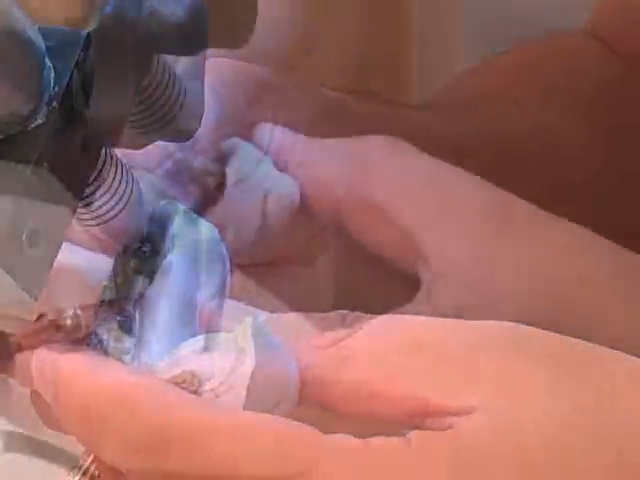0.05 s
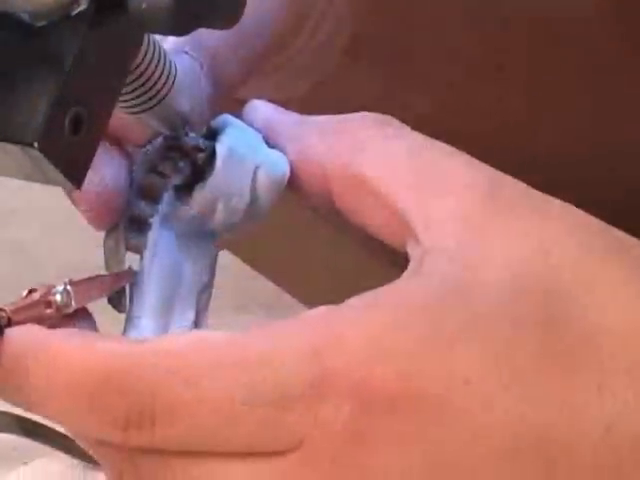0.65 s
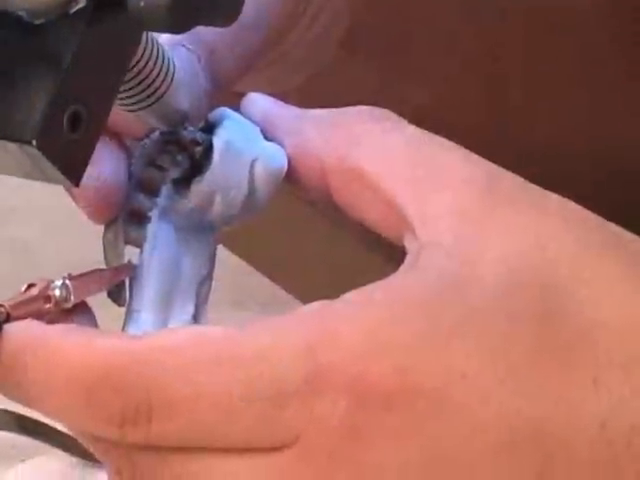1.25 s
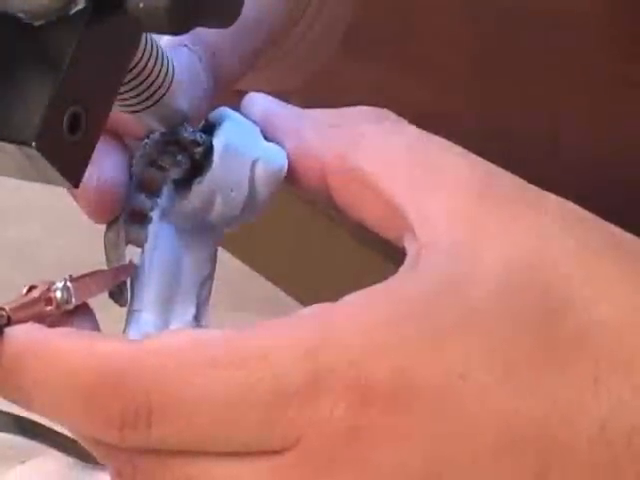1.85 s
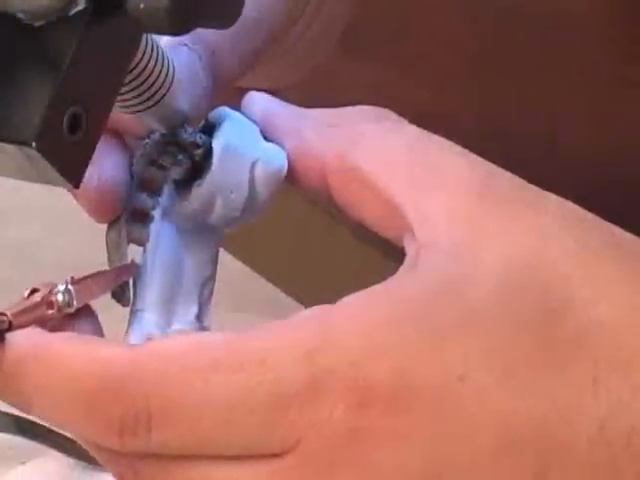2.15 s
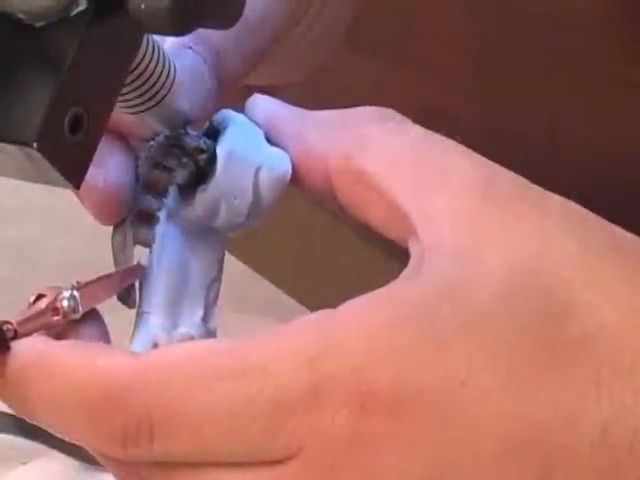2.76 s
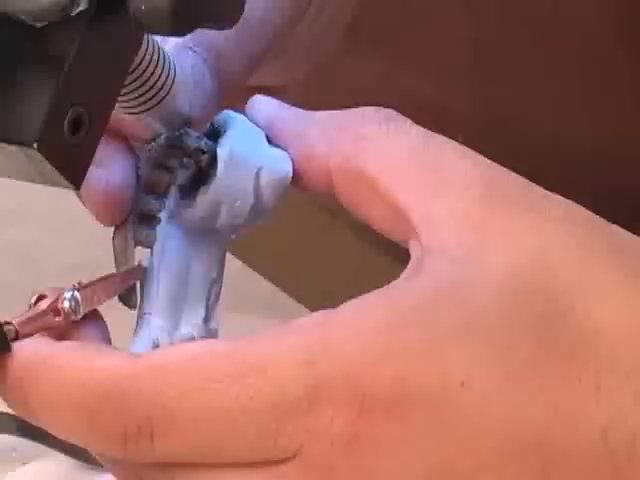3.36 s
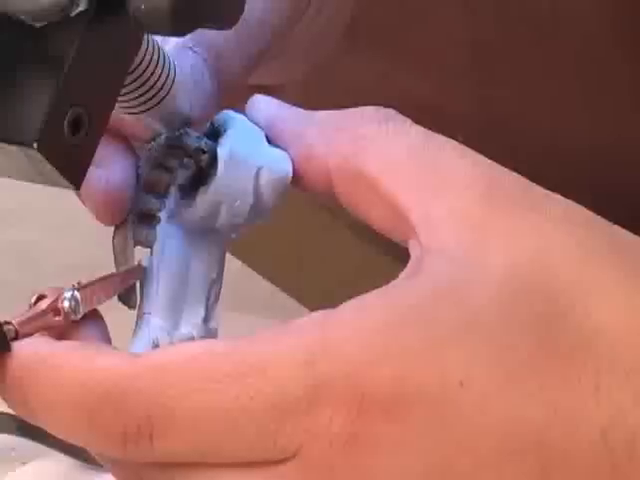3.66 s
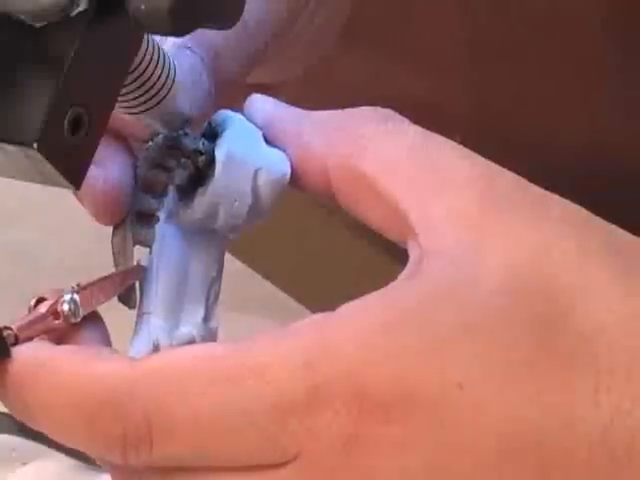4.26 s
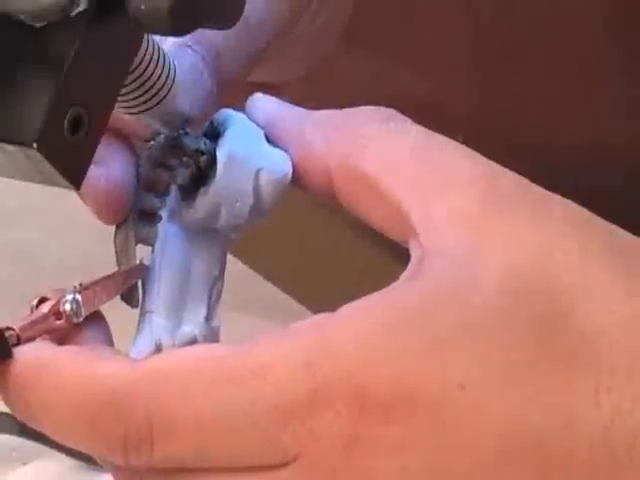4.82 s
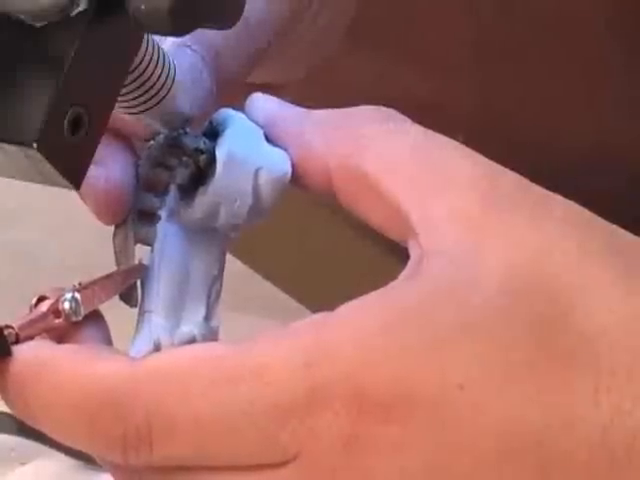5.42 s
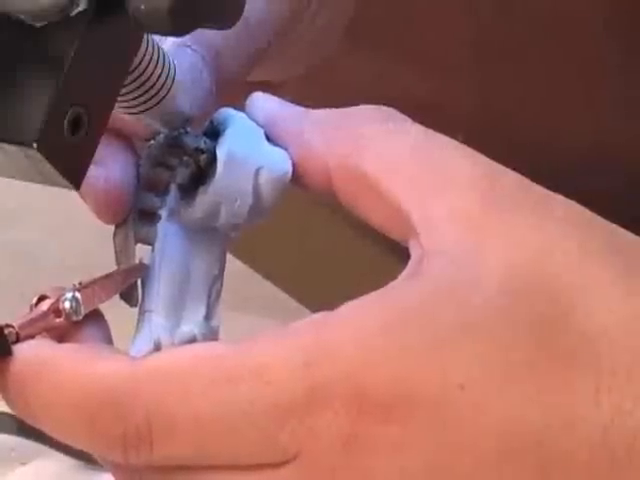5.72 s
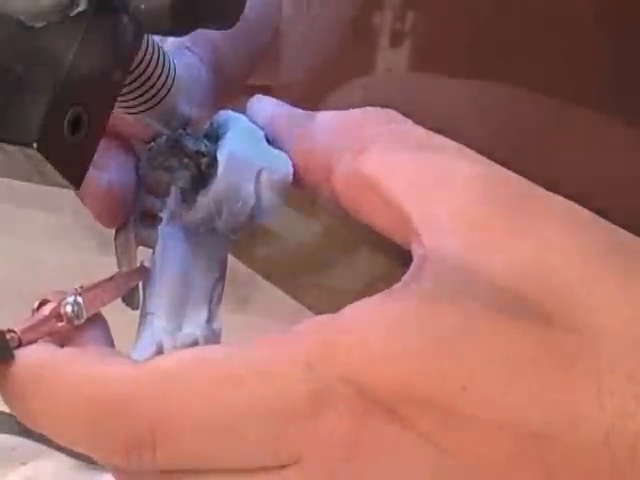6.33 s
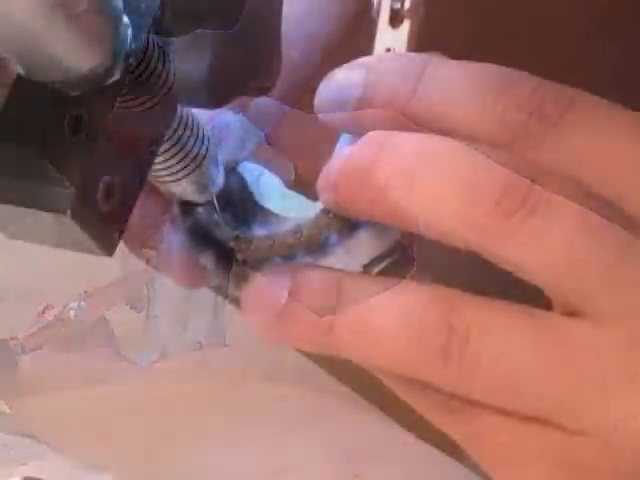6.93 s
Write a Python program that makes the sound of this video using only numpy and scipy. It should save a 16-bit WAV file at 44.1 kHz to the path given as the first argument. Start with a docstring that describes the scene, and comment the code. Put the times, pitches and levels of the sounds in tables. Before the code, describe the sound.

A valve clicks at about 0.2 seconds and gas surges from a small welder's nozzle, settling into a thin, breathy hiss with soft low puffs against fingers. Near 1.6 seconds the metal tip clacks back and an arc cracks sharply, fizzing briefly. At 1.9 the tip clicks free and rattles home loudly; at 2.1 the valve snaps shut and the hiss stops. The gas reopens at 2.3, a second arc cracks at 3.7, clicks follow at 4.0, and the valve shuts near 4.25. The hiss returns almost at once, leading to a third crack at 5.75, clicks at 6.0 and the valve closing at 6.3. The hand-held metal piece knocks faintly between welds and again at 6.5. Hands rub it briefly, ending in a soft thud near 6.9. Everything is close, with a slight room echo over low, steady workshop noise.

```python
"""First you hear a click and a rush of hiss: a valve opens and shielding gas flows from a welder's nozzle.
The electrode (the welder's metal tip) snaps back, an electric arc cracks and fizzes, the electrode is
released and rattles home, and the valve shuts. This small welder makes three such spot welds, close by,
on a hand-held metal piece. The piece knocks lightly, and at the end the hands rub it as they turn it.
Low workshop noise lies under it all."""
import sys
import numpy as np
from scipy import signal
from scipy.fft import rfft, irfft
from scipy.io import wavfile
from scipy.ndimage import uniform_filter1d

SR = 44100
rng = np.random.default_rng(int(sys.argv[2]) if len(sys.argv) > 2 else 0)


def int16_out(signal):
    """Quantize to a 16-bit WAV file."""
    q = np.round(np.clip(np.atleast_2d(signal).T, -1, 1) * 32767)
    wavfile.write(sys.argv[1], SR, q.astype(np.int16))


N = 307994
T = np.arange(N) / SR

# The arc cracks: start_s, level_db, burn_s
ARC_STRIKES = [(1.5803, -25.5, 0.0033), (3.7357, -30, 0.0104), (5.759, -24, 0.003)]
# Moving parts hit each other: start_s, level_db, contact_s
VALVE_OPENINGS = [(.156, -35, 0.011), (2.313, -32, 0.00468), (4.328, -44.5, 0.034)]
PULLBACKS = [(1.520, -51, 0.038), (1.5515, -26.5, 0.011), (3.693, -43.5, 0.0088), (3.709, -26, 0.0098),
             (5.7135, -46.5, 0.018), (5.731, -25.5, 0.0093)]
RELEASES = [(1.8505, -25.5, 0.0028), (4.007, -27, 0.0049), (6.029, -24, 0.0026)]
VALVE_CLOSINGS = [(2.0998, -32, 0.0036), (4.2548, -35.5, 0.011), (6.279, -33.5, 0.0066)]
# The electrode lands home: start_s, level_db, contact_s, bounce_level_db
LANDINGS = [(1.8962, -18, 0.0044, -29.5), (4.0535, -24.5, .01, -29), (6.099, -34, .01, -44.5)]
# The piece knocks in the hands: start_s, level_db, contact_s, thud_level_db
PIECE_KNOCKS = [(2.154, -49, 0.014, -39), (2.587, -52, .005, -36), (4.77, -48, .0035, -41),
                (5.648, -47, 0.0039, -44), (6.5042, -38.5, 0.0071, -40), (6.939, -41.5, 0.013, -28)]

# Gas flows: start_s, stop_s, hiss_db, opening_surge_db, rumble_db
GAS_FLOWS = [(0.16, 2.10, -48, 15, -54.5), (2.317, 4.255, -47, 12, -53), (4.347, 6.279, -48.5, 10, -57.5)]
# Brief swells in the hiss, in the gas on the fingers, and in the rubbing: peak_s, boost_db
HISS_SPURTS = [(.853, 3), (1.295, 8), (1.41, 10.5)]
GAS_PUFFS = [(.25, 17), (.94, 14), (2.68, 16), (3.27, 13), (3.35, 17)]
GRIP_SLIPS = [(6.80, 7.5), (6.845, 8)]

# The tone colour of each sound, or how strong it is from low to high: pitch_hz, level_db
ARC_TONE = [(150, -1), (600, -3.5), (2300, -8), (3300, -1), (4700, 2), (7600, 0.5), (8700, -5), (10200, -6),
            (11300, -25)]
SIZZLE_TONE = [(100, 8), (350, -15), (1000, 3), (2000, -1.5), (4700, -5), (7600, -3), (10300, -7.5),
               (11500, -20)]
PULLBACK_TONE = [(100, 8), (250, 4), (800, 3.5), (1900, 6.5), (3500, 7), (5600, 4.5), (6300, -1), (8500, 2),
                 (10400, -0.5), (11300, -18)]
RELEASE_TONE = [(100, 17.5), (300, -14), (600, -4.5), (2000, -6.5), (3300, -20), (5800, -8), (6900, 0),
                (8400, -18), (10300, -11.5), (12000, -31)]
LANDING_TONE = [(100, -2.5), (250, -5.5), (800, -7.5), (1600, -1), (3000, -4), (4800, 4.5), (6200, -8),
                (9600, -11), (11300, -33)]
OPENING_TONE = [(100, -26), (250, 4), (1200, -2), (2300, -11), (3300, -5.5), (6000, -19.5), (8000, -13.5),
                (10300, -15), (12000, -30)]
CLOSING_TONE = [(200, 2.5), (1200, -4.5), (1800, 0.5), (2600, -6.5), (4400, 1.5), (5300, -9.5), (6900, 6),
                (8500, -3.5), (10300, -3.5), (12000, -21)]
JET_TONE = [(600, -40), (1500, -20.5), (2500, -20), (5500, -52), (8200, -24.5), (9300, -25.5),
            (10600, -28.5), (12000, -55.5)]
RUMBLE_TONE = [(25, 4.5), (60, -2), (120, 4), (260, -6), (500, -6), (1050, -6.5), (1450, -20.5),
               (3000, -39.5)]
KNOCK_TONE = [(80, -1), (350, 3), (900, -19), (1300, -12.5), (3400, -14.5), (4600, -11.5), (12000, -34.5)]
RUB_TONE = [(40, -6), (120, 2.5), (270, -0.5), (500, -12), (1100, -19), (2400, -26.5), (6000, -39),
            (11000, -51)]
WORKSHOP_TONE = [(20, -3), (45, -0.5), (110, -2), (300, -0.5), (520, 0), (1060, -10), (2000, -17.5),
                 (6000, -21.5), (12000, -40.5)]

# How each part rings, with levels compared to the hit itself: pitch_hz, width_hz, level_db
TIP_RINGS = [(7500, 200, -10)]
PLUNGER_RINGS = [(1890, 190, -7), (5400, 450, -13)]
LATCH_RINGS = [(3320, 280, -5), (4850, 300, -10), (6830, 400, -4.5)]
END_STOP_RINGS = [(1600, 300, -14), (3050, 400, -16)]
VALVE_RINGS = [(3400, 240, -9), (6780, 260, -13), (10250, 520, -8)]
PIECE_RINGS = [(574, 120, -6.5), (900, 150, -4)]
# The breathy notes of the nozzle: pitch_hz, width_hz, level_db, surge_factor
NOZZLE_NOTES = [(3333, 394, 0.5, 1.26), (4116, 390, -2, 1), (4817, 316, -2.5, 1.23), (7520, 410, -12, 1.11),
                (10130, 670, -22, 0.77)]

# What jolts the welding head: events, delay_s, level_db, pitch_hz, fade_s
# (here and below, a fade_s is the time a sound takes to drop by 60 dB)
HEAD_JOLTS = [(VALVE_OPENINGS, .004, -38.5, 150, .079), (ARC_STRIKES, .013, -32.5, 116, .17),
              (RELEASES, .004, -31, 152, .19), (LANDINGS, .004, -36.5, 100, .14),
              (VALVE_CLOSINGS, .004, -51, 60, .1)]


def arc_cracks():
    """The arc burns for a few thousandths of a second, and the tip rings."""
    return hits(ARC_STRIKES, ARC_TONE, TIP_RINGS, rise_s=.00065, settle_s=.0111,
                ring_fade_s=.027, tail_db=-38, tail_fade_s=.1, grit_db=4)


def arc_sizzle(delay_s=.01, level_db=-37.5, fade_s=.38, size=16384):
    """Hot gas and metal fizz on for a moment after each arc."""
    fizz, t = np.zeros(N), np.arange(size) / SR
    for start_s, _, _ in ARC_STRIKES:
        add(fizz, start_s + delay_s, rng.standard_normal(size) * rise(t, .00146) * fade(t, fade_s))
    tint = unit_energy(colour(signal.unit_impulse(size), SIZZLE_TONE))
    sputter_db = 1.5 * wander(300)
    return signal.fftconvolve(fizz * gain(level_db + sputter_db), tint)[:N]


def electrode_pullbacks():
    """The electrode is pulled back: a faint scrape, then a clack that rings the plunger."""
    return hits(PULLBACKS, PULLBACK_TONE, PLUNGER_RINGS, rise_s=.0029, settle_s=.0061,
                ring_fade_s=.054, tail_db=-12, tail_fade_s=.26, grit_db=-2)


def electrode_releases():
    """The latch lets the electrode go with a ringing click."""
    return hits(RELEASES, RELEASE_TONE, LATCH_RINGS, rise_s=.0011, settle_s=.005,
                ring_fade_s=.04, tail_db=-13, tail_fade_s=.08, grit_db=2.4)


def electrode_landings(bounce_delay_s=.025, bounce_contact_share=.67):
    """The electrode slides home, hits its stop and bounces once."""
    contacts = []
    for start_s, level_db, contact_s, bounce_db in LANDINGS:
        contacts.append((start_s, level_db, contact_s))
        contacts.append((start_s + bounce_delay_s, bounce_db, contact_s * bounce_contact_share))
    return hits(contacts, LANDING_TONE, END_STOP_RINGS, rise_s=.0017, settle_s=.0032,
                ring_fade_s=.13, tail_db=-9.5, tail_fade_s=.085, grit_db=5.5)


def valve_openings():
    """The gas valve opens with a click that does not ring."""
    return hits(VALVE_OPENINGS, OPENING_TONE, [], rise_s=.00042, settle_s=.0045,
                ring_fade_s=.1, tail_db=-8, tail_fade_s=.42, grit_db=1)


def valve_closings():
    """The gas valve snaps shut and rings brightly."""
    return hits(VALVE_CLOSINGS, CLOSING_TONE, VALVE_RINGS, rise_s=.0003, settle_s=.005,
                ring_fade_s=.11, tail_db=-15, tail_fade_s=.18, grit_db=2.4)


def head_jolts():
    """Clicks and arcs shake the welding head on its arm, adding a low thump just after them."""
    out = np.zeros(N)
    for events, delay_s, level_db, pitch_hz, fade_s in HEAD_JOLTS:
        for start_s, *_ in events:
            add(out, start_s + delay_s, thump(level_db, pitch_hz, fade_s))
    return out


def gas():
    """Stored pressure surges out as the valve opens, then the gas flows on until it shuts."""
    hiss_gain, rumble_gain, surge_db = np.zeros((3, N))
    for start_s, stop_s, hiss_db, opening_db, rumble_db in GAS_FLOWS:
        # the hose fills quickly and empties a little more slowly
        flow = on_between(start_s, stop_s, rise_s=.007, fall_s=.02)
        hiss_gain += flow * gain(hiss_db)
        rumble_gain += flow * gain(rumble_db)
        age_s = np.maximum(T - start_s, 0)
        surge_db += (T > start_s) * opening_db * np.exp(-(age_s / .12) ** 1.28)
    return hiss_gain * nozzle_hiss(surge_db) + rumble_gain * gas_on_fingers()


def nozzle_hiss(surge_db, dip_db=-1.5, dip_ease_s=.15):
    """A fluttering jet hisses, and its swirls make the nozzle sing breathy notes."""
    notes, surging_notes = np.zeros((2, N))
    for pitch_hz, width_hz, level_db, surge_factor in NOZZLE_NOTES:
        swirls = rng.standard_normal(N) * gain(1.5 * wander(70))
        note = gain(level_db) * resonate(swirls, pitch_hz, width_hz)
        notes += note
        surging_notes += note * gain(surge_factor * surge_db)
    # spurts lift the jet more than the notes, so the hiss brightens
    spurt_db = swells(HISS_SPURTS, width_s=.018) + 1.6 * wander(22.14)
    nozzle = surging_notes * gain(.64 * spurt_db)
    jet = colour(rng.standard_normal(N), JET_TONE) * gain(.73 * surge_db + spurt_db)
    flutter_db = 1.9 * wander(170) + .6 * wander(60)
    # the hiss sinks while the electrode is back, from each arc until it lands
    drawn_back = sum(1. * (T > arc[0]) * (T < home[0]) for arc, home in zip(ARC_STRIKES, LANDINGS))
    drift_db = dip_db * uniform_filter1d(drawn_back, int(dip_ease_s * SR)) + .5 * wander(2.82)
    return (nozzle + jet) / np.std(notes) * gain(drift_db + flutter_db)


def gas_on_fingers():
    """Gas rumbles against the fingers, with a few strong puffs and weaker random ones."""
    puff_db = np.maximum(swells(GAS_PUFFS, width_s=.026), 3 * wander(12))
    rumble = noise(RUMBLE_TONE) * gain(.97 * wander(20) + .24 * puff_db)
    puffs = unit_level(resonate(rng.standard_normal(N), pitch_hz=245, width_hz=155))
    return rumble + puffs * gain(-7.5 + puff_db)


def piece_knocks():
    """The metal piece knocks lightly and thuds against the palm."""
    out = hits(PIECE_KNOCKS, KNOCK_TONE, PIECE_RINGS, rise_s=.00036, settle_s=.011,
               ring_fade_s=.0184, tail_db=-29.5, tail_fade_s=.087, grit_db=.5)
    for start_s, _, _, thud_db in PIECE_KNOCKS:
        add(out, start_s, thump(thud_db, pitch_hz=45, fade_s=.044))
    return out


def hand_rub(start_s=6.6, stop_s=6.94, level_db=-50, judder_hz=112.1, count=80):
    """Skin sticks, slips and rustles as the piece is turned, louder where the grip gives way."""
    gaps_s = np.exp(.2 * rng.standard_normal(count)) / judder_hz
    # the skin stretches slowly, then snaps back at each tiny slip
    stretch = np.interp(T, start_s + np.cumsum(gaps_s), np.arange(count)) % 1
    judder = colour(np.diff(stretch, prepend=0), RUB_TONE)
    rustle = gain(1) * noise(RUB_TONE)
    rub = judder / np.std(judder[T > start_s]) + rustle
    moving = on_between(start_s, stop_s, rise_s=.007, fall_s=.0096)
    return rub * moving * gain(level_db + swells(GRIP_SLIPS, width_s=.017) + 1.5 * wander(70))


def room_echo(sound, echo_db=-10.5, fade_s=.241, size=22050):
    """The sound plus its blurred reflections from the bench and walls."""
    t = np.arange(size) / SR
    echo = rng.standard_normal(size) * fade(t, fade_s) * rise(t, .0063)
    echo = colour(echo, [(200, 0), (2000, -4.5), (6000, -9), (12000, .5)])
    return sound + gain(echo_db) * signal.fftconvolve(sound, unit_energy(echo))[:N]


def workshop_noise(level_db=-51.5):
    """The steady low noise of the room."""
    return noise(WORKSHOP_TONE) * gain(level_db)


def hits(events, tone, rings, rise_s, settle_s, ring_fade_s, tail_db, tail_fade_s, grit_db, size=16384):
    """Each hit fades in quickly, chatters, rings its part and dies into a soft tail."""
    lead_s = .02  # room for the fade-in
    out, t = np.zeros(N), np.arange(size) / SR - lead_s
    fade_in = np.exp(np.minimum(t, 0) / rise_s)
    tail = gain(tail_db) * fade(np.maximum(t, 0), tail_fade_s)
    for start_s, level_db, contact_s, *_ in events:
        since_contact_s = np.maximum(t - contact_s, 0)
        grains = np.repeat(rng.standard_normal(size // 32), 32)
        chatter = np.exp(-since_contact_s / settle_s) * gain(grit_db * grains)
        force = rng.standard_normal(size) * fade_in * (chatter + tail)
        crack = unit_energy(colour(force, tone))
        shiver = rng.standard_normal(size) * fade_in * fade(since_contact_s, ring_fade_s)
        ring = sum(gain(db) * unit_energy(resonate(shiver, hz, width_hz)) for hz, width_hz, db in rings)
        strength = gain(level_db) * np.sqrt((contact_s + settle_s / 2) * SR)  # longer hit, more energy
        add(out, start_s - lead_s, strength * unit_energy(crack + ring))
    return out


def thump(level_db, pitch_hz, fade_s, size=16384):
    """One lurch, then a brief shudder with a hollow knock."""
    t = np.arange(size) / SR
    lurch = -np.sin(2 * np.pi * pitch_hz * t) * fade(t, .028)
    tone = [(20, -10), (min(pitch_hz, 240), 0), (290, -3), (460, -17), (1500, -45), (5000, -75)]
    shudder = colour(rng.standard_normal(size), tone) * fade(t, fade_s)
    body = unit_energy(lurch) + gain(2) * unit_energy(shudder)
    return gain(level_db) * np.sqrt(fade_s / np.log(1000) / 2 * SR) * unit_energy(body)


def colour(sound, tone, size=4096):
    """Filter a sound to follow a list of pitch_hz, level_db points."""
    pitch_hz, level_db = np.transpose(tone)
    grid_hz = np.maximum(np.arange(size // 2 + 1) * SR / size, 1)
    curve = gain(np.interp(np.log(grid_hz), np.log(pitch_hz), level_db))
    # folding the cepstrum (the log curve turned into time) keeps the filter from sounding before a hit
    cepstrum = irfft(np.log(curve))
    cepstrum[1:size // 2] *= 2
    cepstrum[size // 2 + 1:] = 0
    return signal.fftconvolve(sound, irfft(np.exp(rfft(cepstrum))))[:len(sound)]


def resonate(sound, pitch_hz, width_hz):
    """Keep just a band of the sound around one pitch."""
    b, a = signal.iirpeak(pitch_hz, pitch_hz / (1.5 * width_hz), fs=SR)
    return signal.lfilter(b, a, signal.lfilter(b, a, sound))


def noise(tone):
    """Steady noise with the given tone colour."""
    return unit_level(colour(rng.standard_normal(N), tone))


def wander(rate_hz):
    """A smooth random curve with a typical size of 1."""
    hold = int(SR / rate_hz)
    steps = np.repeat(rng.standard_normal(N // hold + 1), hold)
    return unit_level(uniform_filter1d(uniform_filter1d(steps, hold), hold)[:N])


def swells(events, width_s):
    """A curve in decibels with one smooth hump for each event."""
    return sum(boost_db * np.exp(-((T - peak_s) / width_s) ** 2) for peak_s, boost_db in events)


def on_between(start_s, stop_s, rise_s, fall_s):
    """Ease up to 1 from the start, and back to 0 after the stop."""
    return rise(np.maximum(T - start_s, 0), rise_s) * np.exp(-np.maximum(T - stop_s, 0) / fall_s)


def rise(t, rise_s):
    """Climb from 0 towards 1."""
    return 1 - np.exp(-t / rise_s)


def fade(t, fade_s):
    """Die away by 60 dB every fade_s."""
    return np.exp(-np.log(1000) * t / fade_s)


def gain(db):
    """Turn decibels into a multiplier."""
    return 10 ** (np.asarray(db) / 20)


def unit_level(sound):
    """Scale to an average (rms) level of 1."""
    return sound / np.sqrt(np.mean(sound ** 2))


def unit_energy(sound):
    """Scale to a total energy of 1."""
    return sound / np.sqrt(np.sum(sound ** 2))


def add(out, start_s, sound):
    """Mix a sound into out at the given time."""
    first = int(start_s * SR)
    out[first:first + len(sound)] += sound[:N - first]


def scene():
    """The welder and the hands in the workshop, in one channel."""
    impacts = (valve_openings() + electrode_pullbacks() + arc_cracks() + arc_sizzle()
               + electrode_releases() + electrode_landings() + valve_closings()
               + piece_knocks() + head_jolts())
    return (room_echo(impacts) + gas() + hand_rub() + workshop_noise())[None]


def record(dry, top_hz=11950):
    """Cut away the highest treble steeply."""
    return signal.sosfilt(signal.ellip(10, .2, 75, top_hz, fs=SR, output="sos"), dry)


dry = scene()
out = record(dry)
int16_out(out)
```